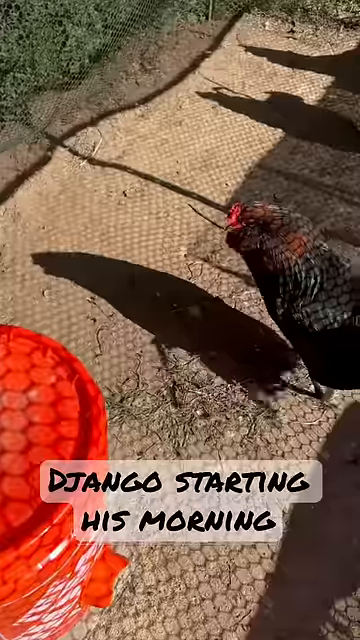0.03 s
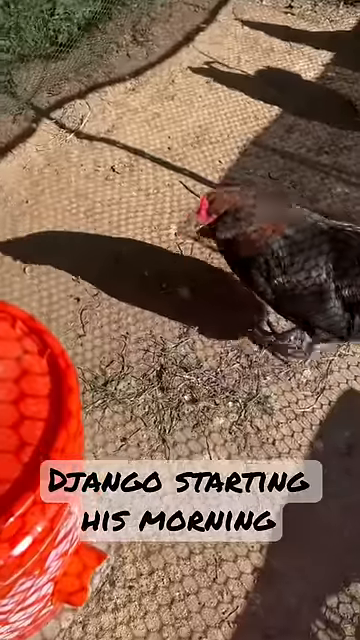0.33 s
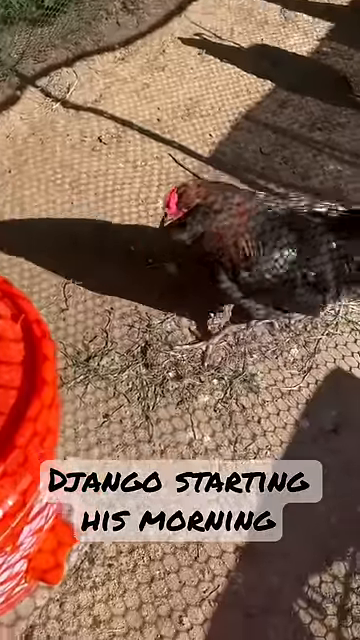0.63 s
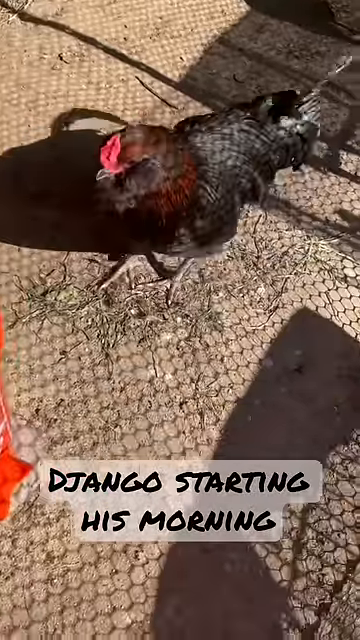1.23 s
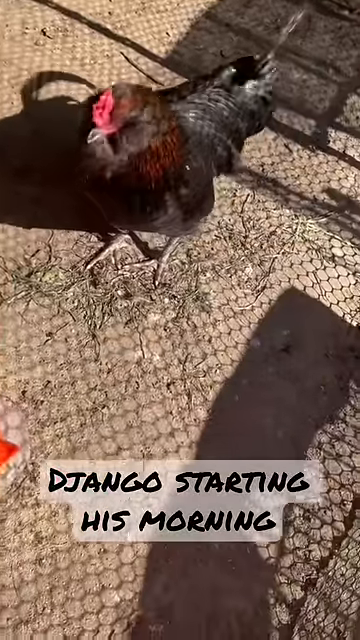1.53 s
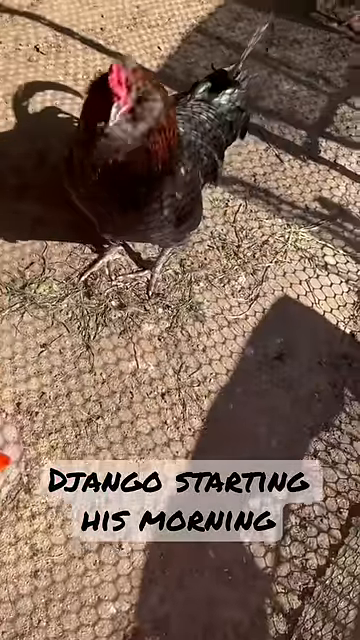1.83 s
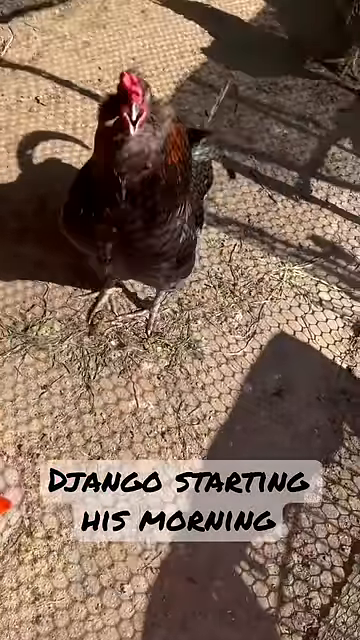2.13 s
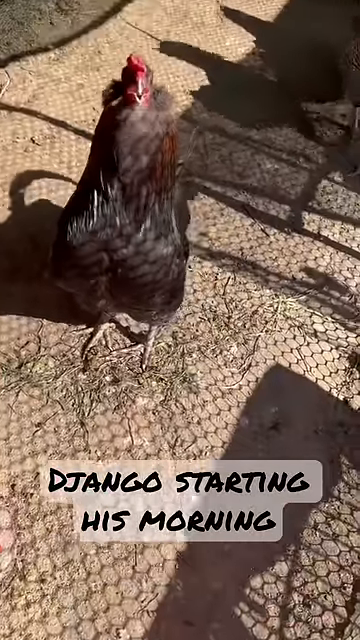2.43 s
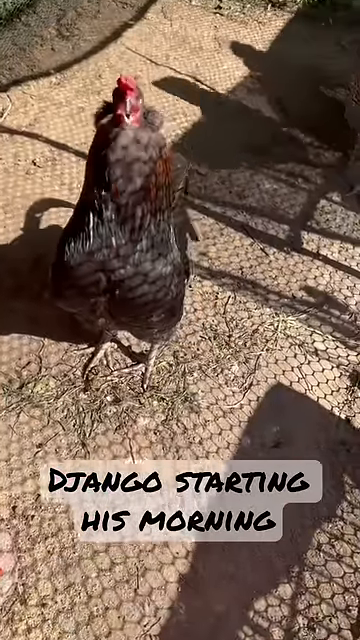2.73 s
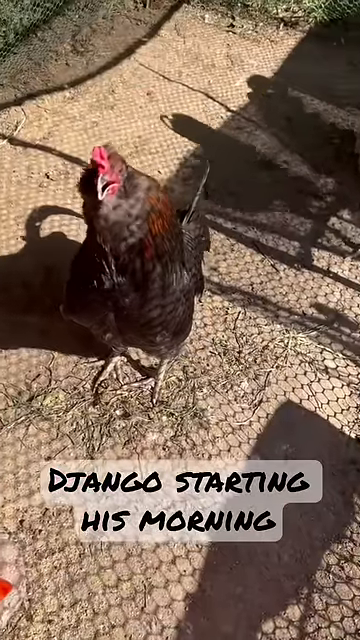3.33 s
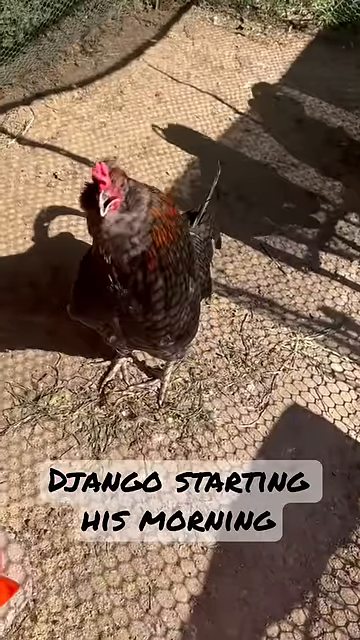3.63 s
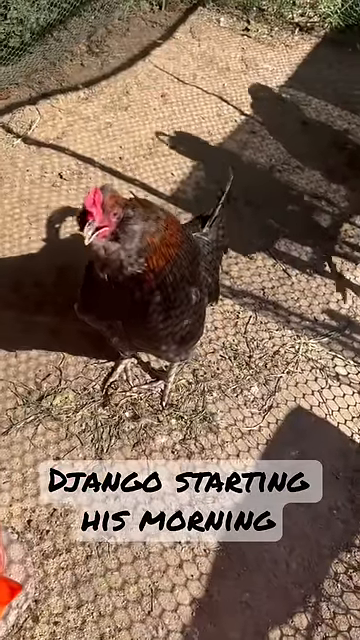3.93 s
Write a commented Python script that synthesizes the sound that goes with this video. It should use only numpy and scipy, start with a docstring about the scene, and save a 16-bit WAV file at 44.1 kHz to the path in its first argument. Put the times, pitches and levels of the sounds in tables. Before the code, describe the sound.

A close rooster crow, two short syllables and one long note, follows soft hen sounds.

```python
"""Rooster in a chicken run

A close rooster crows two short syllables and a long held one: syrinx harmonics shaped by throat and
beak, rasping where the pitch breaks, with a second membrane beating near the end. Before it a hen
moans and clucks and feet scratch in dry litter, over air, insect hiss, a low hum and puffs of wind."""
import sys
import numpy as np
from scipy import signal
from scipy.fft import rfft, irfft
from scipy.io import wavfile

SR = 44100
rng = np.random.default_rng(int(sys.argv[2]) if len(sys.argv) > 2 else 0)


def put_to_file(sound):
    """Save the sound as 16-bit audio at rate SR, in the file named by the first command-line argument."""
    columns = np.atleast_2d(sound).T  # one column per channel
    safe = np.clip(columns, -1, 1)
    whole_steps = np.round(safe * 32767)
    wavfile.write(sys.argv[1], SR, whole_steps.astype(np.int16))


N = 176400
T = np.arange(N) / SR
HZ = np.fft.rfftfreq(N, 1 / SR)


def rooster():
    """Harmonics of the syrinx jitter and turn to rasp where the pitch breaks."""
    # Each row: time in seconds, pitch in Hz.
    pitch = [(2.138, 506), (2.157, 540), (2.165, 726), (2.21, 764), (2.242, 781), (2.286, 720),
             (2.297, 530), (2.438, 530), (2.457, 764), (2.49, 803), (2.525, 816), (2.577, 772),
             (2.596, 535), (2.63, 528), (2.642, 680), (2.668, 775), (2.8, 769.4), (2.87, 782), (2.95, 828),
             (3.01, 730), (3.116, 781.5), (3.2, 788.2), (3.35, 801.5), (3.6, 797), (3.68, 787.7),
             (4, 776.3)]
    # Two phrases, then the held note. Each row: time in seconds, then levels in dB of fundamental,
    # second harmonic, overtones, treble.
    phrases = [
        [(2.139, -25.5, -18, -17.5, -35), (2.154, -13.5, -18, -16, -26.5), (2.17, -18, -12, -22, -32),
         (2.21, -24, -12, -34, -40), (2.236, -20.5, -19.5, -35.5, -31.5), (2.255, -25, -12, -40, -38),
         (2.284, -21, -14.5, -26, -37), (2.295, -30, -27.5, -29, -50), (2.335, -69.5, -42, -53, -70)],
        [(2.428, -32.5, -28, -25, -43), (2.465, -13.5, -12.5, -25.5, -34), (2.52, -16, -14, -34, -32),
         (2.575, -14.5, -13.5, -30, -33.5), (2.602, -38.5, -34, -24.5, -45.5), (2.63, -32, -26, -25, -38),
         (2.668, -17.5, -15.5, -30, -34.5)],
    ]
    held = [(2.85, -20.5, -16, -34, -35), (2.94, -20.5, -19, -32.5, -34), (3.02, -24.5, -20, -28, -38.5),
            (3.12, -24.5, -19, -43.5, -44), (3.27, -30, -28.5, -36, -38.5), (3.419, -31, -29.5, -35.5, -38),
            (3.701, -29, -22, -39, -42), (3.97, -30, -19.5, -38.5, -39)]
    # Rasp contour and brief cracks. Each row: time in seconds, roughness 0-1.
    roughness = [(2.138, 0.62), (2.155, 0.54), (2.172, 0.02), (2.28, 0.05), (2.295, 0.73), (2.32, .42),
                 (2.435, 0.71), (2.462, 0.03), (2.578, 0.05), (2.596, .55), (2.611, .3), (2.628, .28),
                 (2.645, 0.7), (2.668, .11), (2.83, 0.07), (2.88, 0.02), (3.15, 0.015), (3.55, 0.022),
                 (3.95, 0.02)]
    crack_peaks = [(2.742, 0.62), (2.772, 0.6), (2.801, 0.65)]
    # A static filter dips the crow near 4.25 and 5 kHz and lifts it near 3.55 kHz.
    # Each row: frequency in Hz, gain in dB.
    notches = [(3250, 0), (3550, 4.5), (3900, -1), (4250, -7.5), (4600, -0.5), (5000, -3.5), (5300, 0)]

    levels = [*phrases[0], *phrases[1], *held]
    first, second, overtones, treble = (amp(curve(levels, column=k)) for k in range(1, 5))
    start_s, stop_s, restart_s = phrases[0][0][0], phrases[0][-1][0], phrases[1][0][0]
    attack = np.clip((T - start_s) / 0.0026 + 0.5, 0, 1)
    release = np.exp(-np.maximum(T - stop_s, 0) / 0.003)
    reattack = np.clip((T - restart_s) / 0.0036 + 0.5, 0, 1)
    gate = attack * np.maximum(release, reattack)

    cracks = sum(depth * bump(at_s, width_s=0.006) for at_s, depth in crack_peaks)
    rough = np.clip(curve(roughness) + cracks, 0, 0.95)
    flutter_hz = 37.74
    flutter = 0.021 * np.sin(2 * np.pi * flutter_hz * T) + 0.0041 * drift(140)
    jitter = 0.00215 * drift(18) + 0.03 * rough * drift(344)
    hz = curve(pitch) * (1 + jitter + np.minimum(rough / 0.11, 1) * flutter)
    phase = phase_of(hz)

    voice = second * np.cos(2 * phase) - first * np.cos(phase)
    voice += throat_harmonics(hz, phase, overtones, treble)
    voice *= np.sqrt(2 * (1 - rough ** 2))
    voice = signal.sosfilt(signal.butter(6, 430, "high", fs=SR, output="sos"), voice)
    rasp_gain = amp(-0.5 + 3 * cracks) * rough * np.sqrt(2 * overtones ** 2 + 0.36 * second ** 2)
    source = gate * (voice + rasp_gain * rasp(phase))
    crow = irfft(rfft(source) * amp(spectrum_at(notches, HZ)), N)
    return ports(crow + membrane_beat(hz, phase))


def throat_harmonics(hz, phase, overtones, treble):
    """Harmonics 3-22 through throat and beak, in two bands; the beak narrows in the held note."""
    # Each row: frequency in Hz, gain in dB. The first shape counts twice until the beak narrows,
    # then each counts once.
    throat = [(2150, 1), (2350, -7), (2450, -2), (3120, -5), (3550, -22), (3930, -4), (4250, -17.5),
              (4650, -10), (5000, -16), (5600, -4.5), (6400, -11), (7100, -4), (8100, -10), (8800, -18.5),
              (10500, -13.5), (15500, -17)]
    throat_narrow = [(2350, -3), (3150, -25), (3950, -28), (4700, -10), (5550, -10.5), (6250, -18.5),
                     (6390, 1), (6480, 2), (6950, -32), (7900, -22.5), (8700, -18), (9500, -11.5),
                     (15500, -17)]
    narrow_at_s, narrowing_s = 3.095, 0.012
    narrow = np.clip((T - narrow_at_s) / narrowing_s, 0, 1)
    orders = np.arange(3, 23)[:, None]
    gains = []
    for k in orders:
        open_db = spectrum_at(throat, k * hz) + 2.5 * drift(31.4)
        narrow_db = spectrum_at(throat_narrow, k * hz) + 3 * drift(6.6)
        gains.append(amp((2 - narrow) * open_db + narrow * narrow_db))
    high = np.clip((orders * hz - 4100) / 400, 0, 1)  # crossover, 4100-4500 Hz
    waves = np.cos(orders * phase + orders ** 2)
    voice = np.zeros(N)
    for share, level in ((1 - high, overtones), (high, treble)):
        weights = np.array(gains) * share
        voice += level * (weights * waves).sum(0) / np.sqrt((weights ** 2).sum(0))
    return voice


def rasp(phase):
    """Air noise pulsed by the syrinx and coloured by resonant peaks."""
    # Each row: frequency in Hz, gain in dB.
    resonances = [(250, -61), (420, -37), (540, -56), (680, 9.5), (900, -6), (1060, 6), (1300, -9),
                  (1500, 2.5), (1900, -11.5), (2130, 9.5), (2400, -4), (2800, 5), (3550, -27), (3950, -18),
                  (4250, -32), (5700, -5), (7200, -15.5), (9000, -25.5), (15500, -30)]
    return colour(air_pulses(phase), resonances)


def membrane_beat(hz, phase):
    """A second membrane beats against the first: a tone on either side of harmonics 1-16."""
    # Each row: time in seconds, level in dB.
    levels = [(3.55, -75), (3.7, -51), (3.83, -47), (3.915, -31), (3.97, -52)]
    # Each row: time in seconds, pitch in Hz.
    membrane = [(3.65, 1087), (3.95, 1028)]
    # Each row: side-tone frequency in Hz, gain in dB.
    shape = [(300, -35), (520, -16), (1300, -2), (2600, -1), (2900, -30), (4400, -32), (5750, -5),
             (7000, -24), (14000, -36)]
    beat_hz = curve(membrane) - hz + 16 * drift(80)
    beat_phase = phase_of(beat_hz)
    tones = np.zeros(N)
    for k in range(1, 17):
        for side in (-1, 1):
            gain = amp(spectrum_at(shape, abs(k * hz + side * beat_hz)))
            tones += gain * np.cos(k * phase + side * beat_phase + k ** 2)
    return amp(curve(levels)) * (T > levels[0][0]) * tones / np.sqrt(2)


def echoes(x, level_db=-29, t60_s=0.35, delay_s=0.006, cutoff_hz=3000):
    """A faint, dull tail from the ground and the pen."""
    t = T[:SR // 2]
    tail = rng.standard_normal((2, len(t))) * amp(-60 * t / t60_s) * (t > delay_s)
    tail = signal.sosfilt(signal.butter(1, cutoff_hz, fs=SR, output="sos"), tail)
    return amp(level_db) * signal.fftconvolve(x, tail / np.linalg.norm(tail[0]), axes=1)[:, :N]


def hen(beak_shut_s=0.27, cluck_hz=685, cluck_db=-39.5):
    """A distant hen: a short open-beaked note, a reedy moan that grows hoarse, one soft cluck."""
    # Each row: time in seconds, pitch in Hz, level in dB.
    notes = [(.1, 500, -100), (.14, 495, -57), (.165, 430, -47.5), (.22, 383.6, -47), (.27, 420.3, -86),
             (.325, 476, -49.5), (.38, 428, -49.5), (.56, 453, -49), (.61, 510, -48), (.68, 450, -46.5),
             (.79, 455, -48.5), (.86, 510, -47.5), (.92, 445, -48), (1.1, 522.4, -47), (1.18, 440, -49),
             (1.24, 420, -65), (1.35, 420, -120)]
    # Each row: time in seconds, roughness 0-1.
    hoarseness = [(.8, .22), (1, .8)]
    # Throat, beak open and shut. Each row: frequency in Hz, gain in dB.
    beak_open = [(400, 3), (1000, -5), (1900, -5), (4000, -35)]
    beak_shut = [(200, -6), (480, 7.5), (900, -5), (1350, -3), (1800, -7), (2300, -20), (6000, -49)]
    rough = curve(hoarseness)
    phase = phase_of(curve(notes) * (1 + 0.121 * rough * drift(156)))
    buzz = unit(sum(np.cos(k * phase) for k in range(1, 9)))
    drive = np.sqrt(1 - rough ** 2) * buzz + 2.5 * rough * air_pulses(phase)
    voice = np.where(T < beak_shut_s, colour(drive, beak_open), colour(drive, beak_shut))
    moan = amp(curve(notes, column=2)) * voice
    ring = np.sin(phase_of(cluck_hz * (1 + 0.121 * drift(186))))
    cluck = amp(cluck_db) * unit(ring) * bump(at_s=0.697, width_s=0.0056)
    return ports(moan + cluck, lean=0.35)


def feet():
    """Each step crushes a quickly dying cluster of dry grains."""
    # Each row: start in seconds, level in dB, decay in seconds.
    steps = [(.264, -46, 0.0069), (0.606, -51.5, 0.024), (.6995, -50, .003), (.953, -53, 0.0062),
             (2.036, -49.5, 0.025), (2.114, -39, .0015)]
    # Each row: frequency in Hz, gain in dB.
    litter = [(500, 1), (4000, -3), (15000, 6)]
    press = sum(amp(db) * (T >= at_s) * np.exp(-abs(T - at_s) / decay_s) for at_s, db, decay_s in steps)
    grains = rng.standard_normal(N) * amp(1.4 * drift(1500))
    return ports(press * colour(grains, litter), lean=0)


def wind():
    """Puffs of wind rumble on the microphone."""
    # Each row: peak time in seconds, level in dB.
    gusts = [(1.599, -37), (1.651, -29), (1.779, -29), (1.825, -35), (1.87, -34.5), (1.945, -27),
             (2.34, -36.5), (2.431, -32.5), (2.881, -43), (3.019, -49), (3.57, -52.5)]
    # Each row: frequency in Hz, relative density in dB.
    rumble = [(15, -22), (55, 0), (100, -2.5), (170, -13), (300, -30.5), (2000, -75)]
    return sum(amp(db) * bump(at_s, width_s=0.026) for at_s, db in gusts) * diffuse(rumble)


def yard():
    """Outdoor air, insect hiss and a wavering hum, all sinking under the crow."""
    # Each row: frequency in Hz, relative density in dB.
    air_shape = [(15, -47.5), (25, -16), (107, 0.5), (181, -11), (234, -8), (332, -14.5), (512, -17),
                 (4500, -33.5), (5300, -43.5), (15500, -43)]
    insect_shape = [(4500, -40), (5800, -15.5), (6350, -4), (6850, -4.5), (7200, -14), (10000, -46)]
    # Each row: frequency in Hz, relative level in dB.
    hum_tones = [(59.2, -56), (113.0, -51), (242.2, -52)]
    # Each row: time in seconds, gain in dB on all three.
    fade = [(2.13, 6.5), (2.17, -2), (2.7, -1.5), (3.1, -14), (4, -17.5)]
    air = amp(-50 + 0.3 * drift(7.7)) * diffuse(air_shape)
    insects = amp(-65 + 0.53 * drift(70)) * diffuse(insect_shape)
    hum = np.zeros(N)
    for hz, db in hum_tones:
        gain = amp(db - 5.5 + 2.24 * drift(7.1))
        hum += gain * unit(np.sin(phase_of(hz + 3 * drift(8.7))))
    return amp(curve(fade)) * (air + insects + hum)


def diffuse(shape):
    """Coloured noise from all around, partly alike in both ports."""
    # Each row: frequency in Hz, left-right coherence 0-1.
    coherence = [(25, .98), (70, .9), (200, .7), (3000, .3), (12000, .9)]
    left, other = rng.standard_normal((2, N))
    same = spectrum_at(coherence, HZ)
    right = irfft(same * rfft(left) + np.sqrt(1 - same ** 2) * rfft(other), N)
    return ports(colour(np.array([left, right]), shape), lean=0)


def ports(x, lean=1, near_hz=705):
    """Stereo from two microphone ports; lean scales the level gap, phases converge below near_hz."""
    # Each row: frequency in Hz, left minus right in dB.
    balance = [(200, -11), (500, 5.5), (1585, 6.5), (1635, -2.5), (1900, 0.5), (2300, 0)]
    # Each row: frequency in Hz, left lead in radians.
    lead = [(250, -2.13), (800, 1), (1560, -1), (2200, 0.6), (6000, 0.7), (9000, -0.95), (11500, -2.5),
            (15000, -3.5)]
    lead_rad = spectrum_at(lead, HZ) * np.minimum(HZ / near_hz, 1)
    half = amp(lean * spectrum_at(balance, HZ) / 2) * np.exp(0.5j * lead_rad)
    return irfft(rfft(x) * np.array([half, 1 / half]), N)


def air_pulses(phase, depth=0.51):
    """Air noise swelling once per cycle."""
    return (1 + depth * np.cos(phase)) * rng.standard_normal(N)


def amp(db):
    """Decibels to gain."""
    return 10 ** (np.asarray(db) / 20)


def unit(x):
    """Scale to rms 1."""
    return x / np.sqrt(np.mean(x ** 2) + 1e-20)


def phase_of(hz):
    """Running phase in radians."""
    return 2 * np.pi * np.cumsum(hz) / SR


def bump(at_s, width_s):
    """Gaussian envelope, peak 1."""
    return np.exp(-((T - at_s) / width_s) ** 2)


def curve(rows, column=1):
    """Table column, linearly interpolated in time."""
    rows = np.array(rows)
    return np.interp(T, rows[:, 0], rows[:, column])


def spectrum_at(shape, hz):
    """Table value at hz, interpolated in log frequency."""
    knots_hz, values = np.transpose(sorted(shape))
    return np.interp(np.log(hz + 1), np.log(knots_hz + 1), values)


def colour(x, shape):
    """Filter by a dB spectrum; rms 1."""
    return unit(irfft(rfft(x) * amp(spectrum_at(shape, HZ)), N))


def drift(rate_hz):
    """Smooth random motion up to about rate_hz; rms 1."""
    return unit(irfft(rfft(rng.standard_normal(N)) * np.exp(-(HZ / rate_hz) ** 2), N))


def scene():
    """The birds in their yard; only the crow echoes."""
    crow = rooster()
    return crow + echoes(crow) + hen() + feet() + yard() + wind()


def record(dry, silence_s=0.035, fade_s=0.003, cutoff_hz=15800):
    """Brief opening silence, then a fast fade-in; steep low-pass."""
    opened = dry * np.clip((T - silence_s) / fade_s, 0, 1)
    lowpass = signal.firwin(511, cutoff_hz, window=("kaiser", 9), fs=SR)
    return signal.oaconvolve(opened, lowpass[None], "same")


dry = scene()
out = record(dry)
put_to_file(out)
```